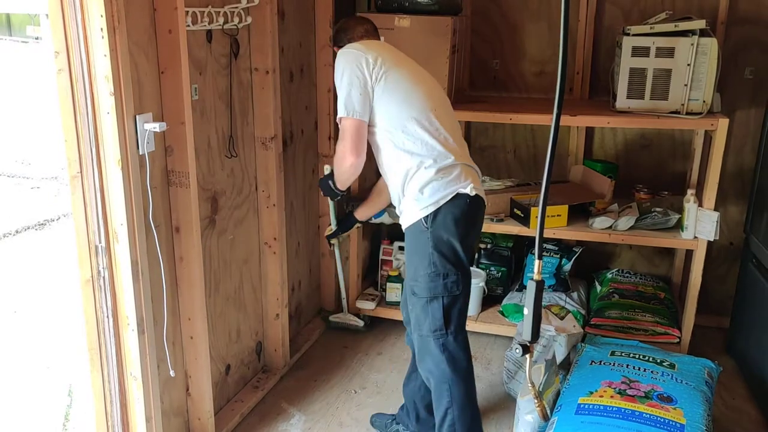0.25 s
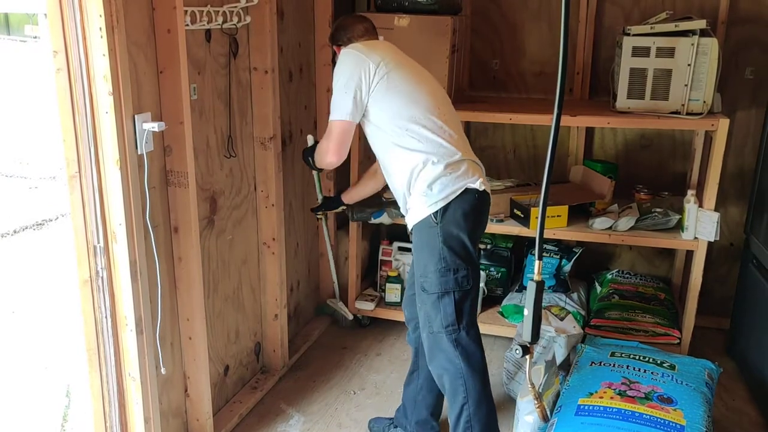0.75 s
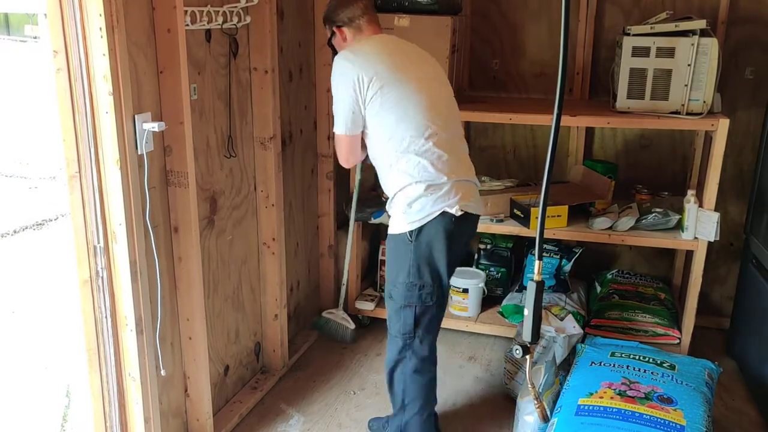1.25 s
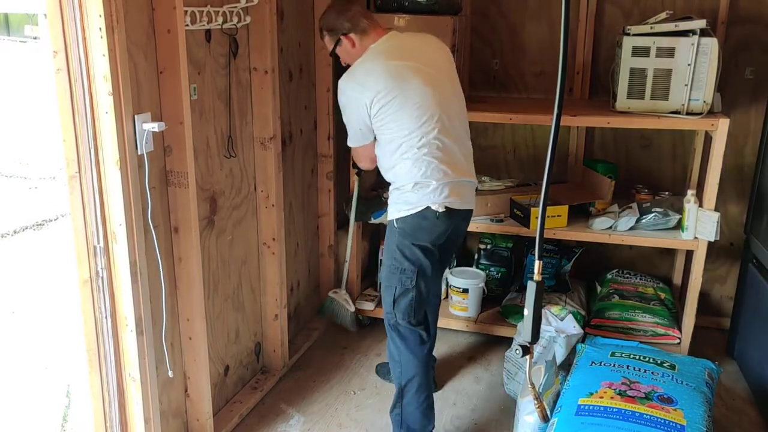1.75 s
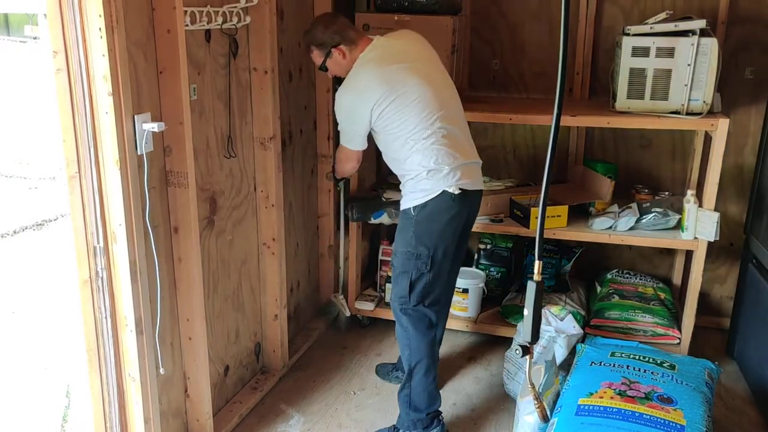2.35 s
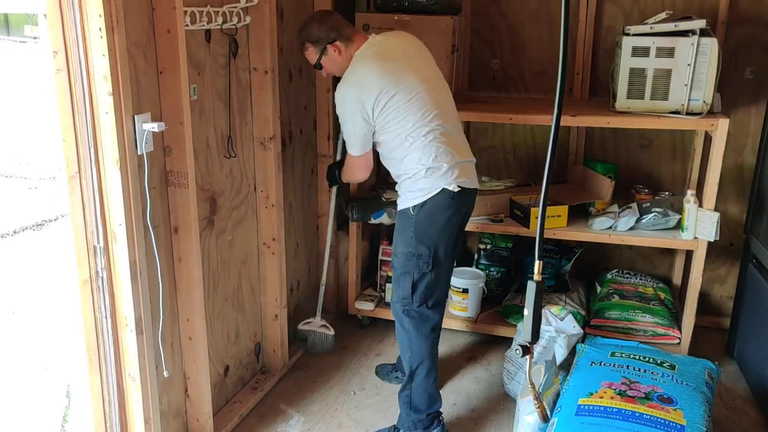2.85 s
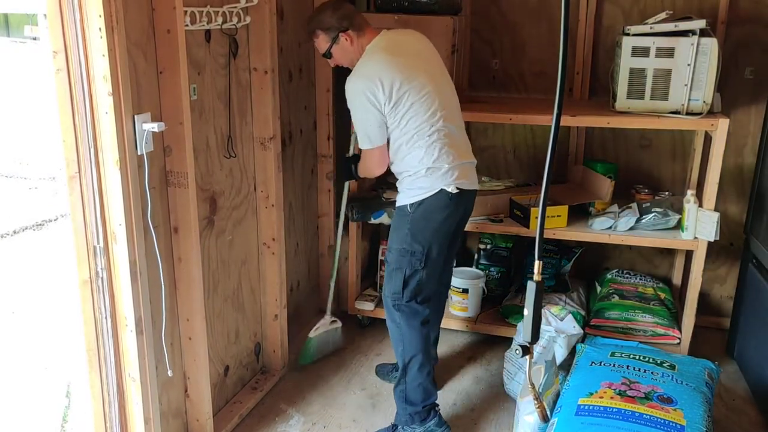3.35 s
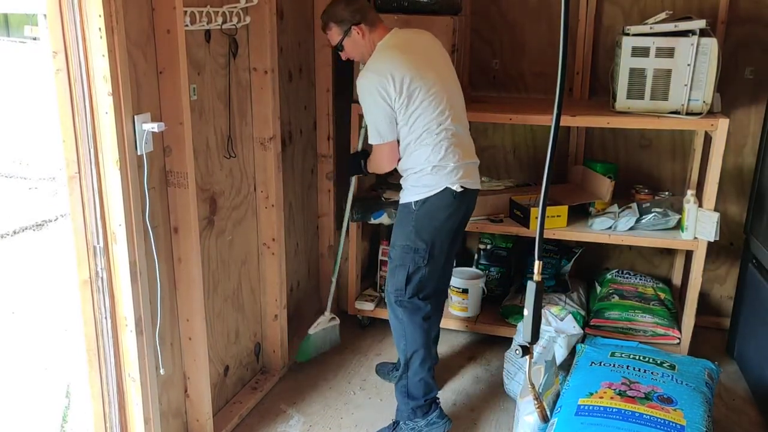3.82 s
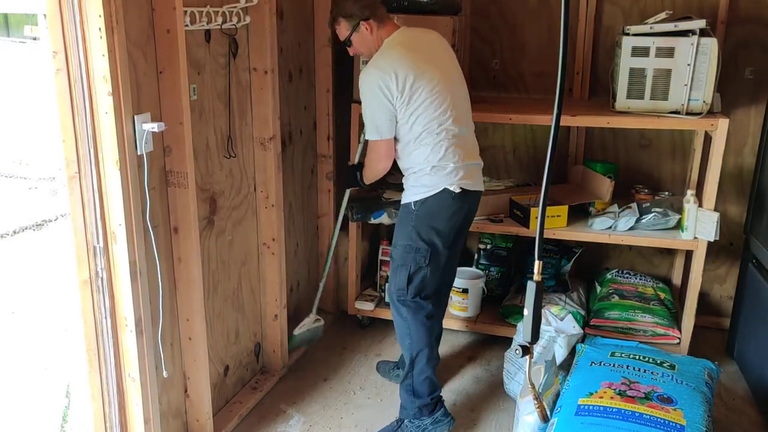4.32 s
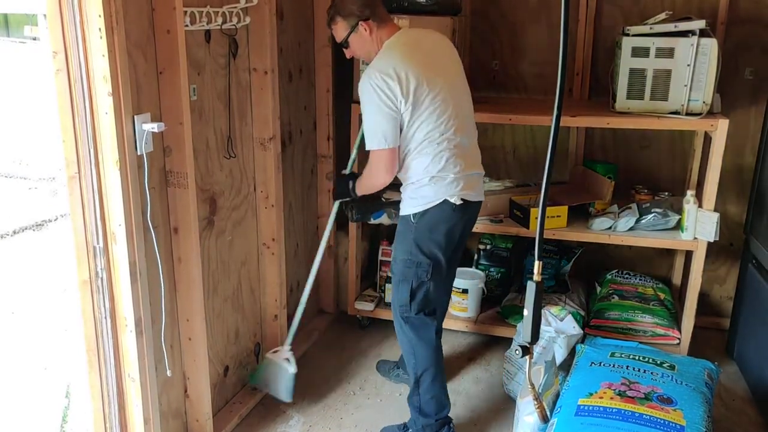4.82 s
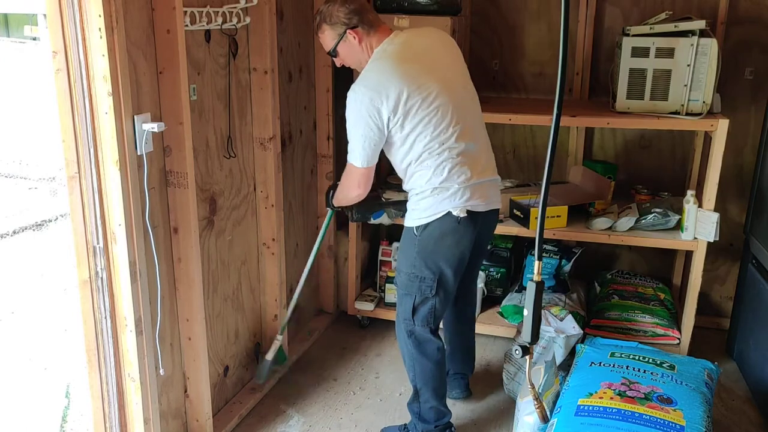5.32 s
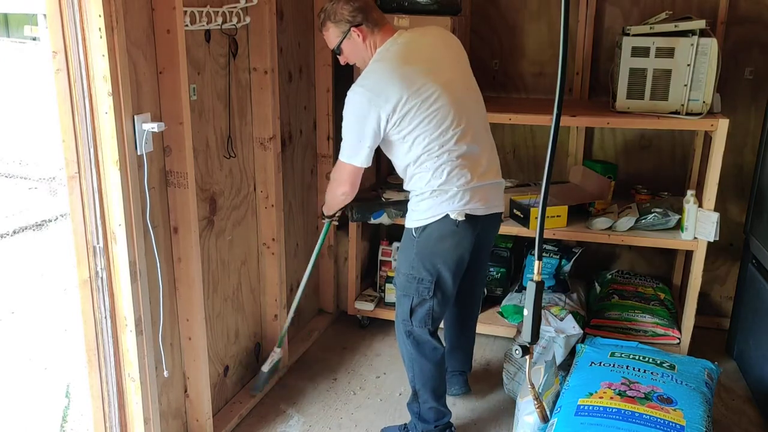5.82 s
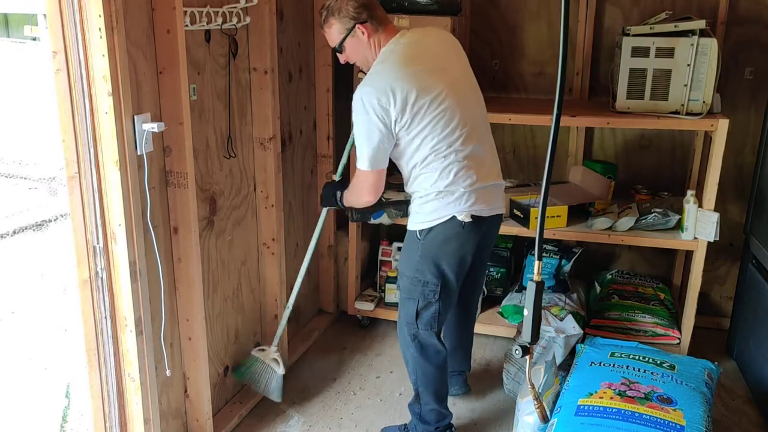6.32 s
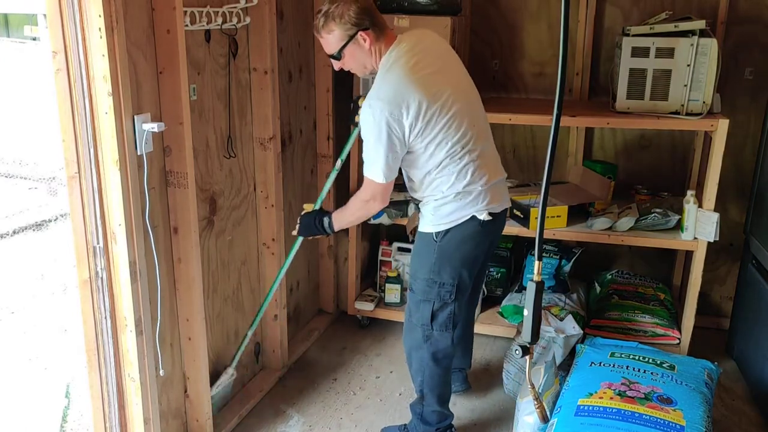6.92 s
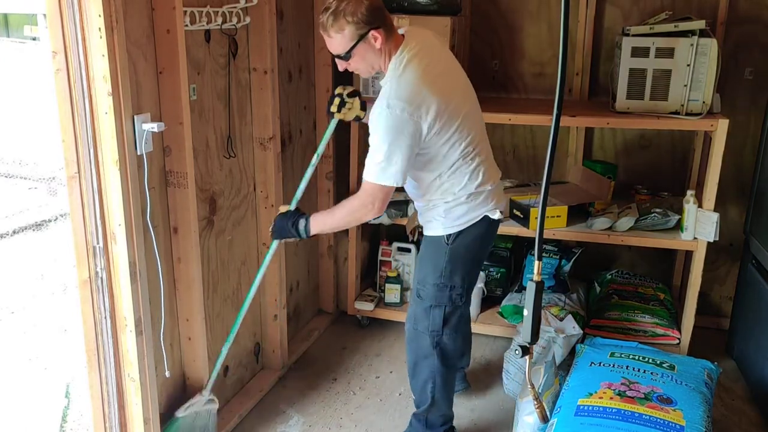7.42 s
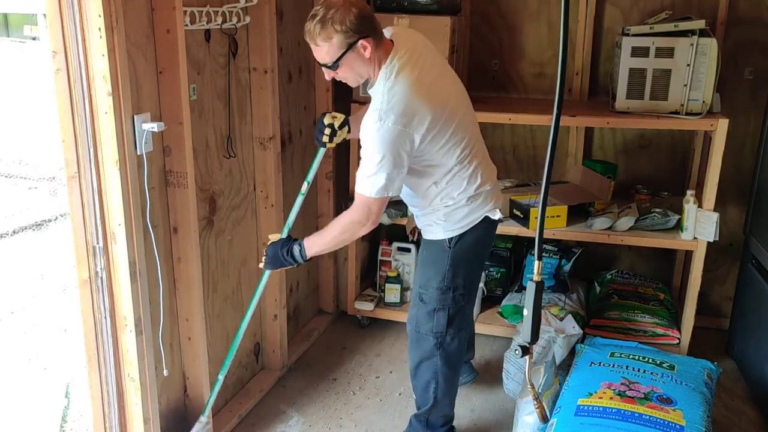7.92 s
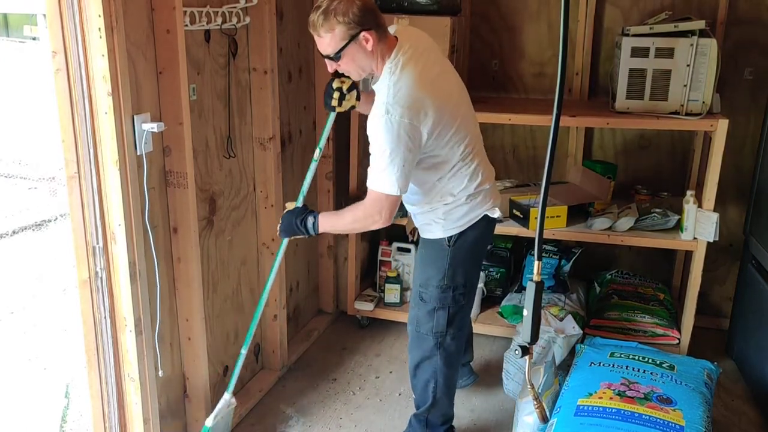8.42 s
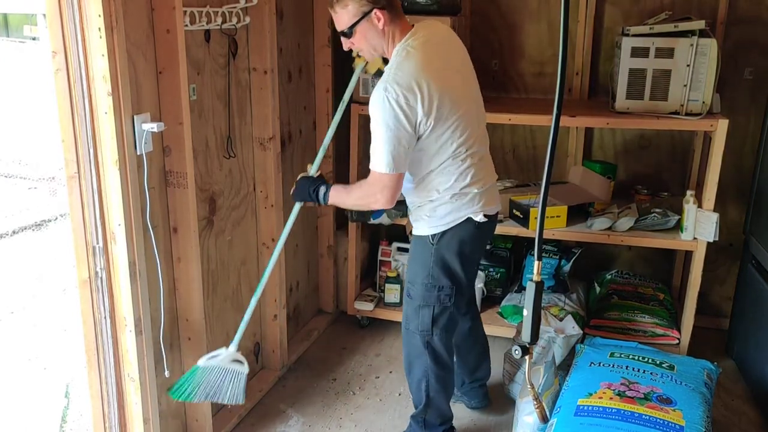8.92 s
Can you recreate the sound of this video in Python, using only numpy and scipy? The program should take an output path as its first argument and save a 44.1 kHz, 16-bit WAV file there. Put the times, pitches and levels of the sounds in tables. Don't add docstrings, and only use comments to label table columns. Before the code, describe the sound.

Close, dry broom strokes in a small wooden shed. Stiff bristles rasp and hiss in uneven passes, the brush drops and slaps, and grit ticks sharply in the middle. The plastic head knocks and rattles on planks, hardest near the end, while the raised floor thuds and booms low. Wide stereo treble, centred bass, very short room tail, faint steady air hiss.

```python
import sys
import numpy as np
from scipy import signal
from scipy.fft import rfft, irfft, next_fast_len
from scipy.io import wavfile
from scipy.ndimage import uniform_filter1d

SR = 44100
rng = np.random.default_rng(int(sys.argv[2]) if len(sys.argv) > 2 else 0)


def bounce(signal):
    frames = np.transpose(np.atleast_2d(signal))
    limited = np.clip(frames, -1, 1)
    pcm = np.round(limited * 32767).astype(np.int16)
    wavfile.write(sys.argv[1], SR, pcm)


def nominal_scale(level):
    x = np.asarray(level, float) / 20
    return 10 ** x


N = 404397

# [t/s of the peak, 20 dB fade/s, drag/dB, tips/dB re drag, pressure/dB re drag]
SWIPES = [(.05, 0.18, -42, -8.5, -11.5), (.22, 0.18, -47.5, -5.5, -3.5), (.35, 0.16, -54.5, -1, -2),
          (.44, 0.1, -53.5, -4, -9.5), (0.782, 0.11, -49, -5.5, -2.5), (1.05, 0.13, -47.5, -6, -8),
          (1.42, 0.3, -60, -6, 0), (1.55, .2, -62, -2, -6), (1.75, 0.24, -54.5, -3.5, -6),
          (2.15, .06, -58, 2, -6), (2.9, 0.19, -40, -7.5, -9), (3.44, 0.48, -43.5, -14, -5),
          (3.65, 0.48, -46.5, -22, -0.5), (3.8, 0.27, -46, -8, -3), (3.89, 0.16, -46.5, -25, -12),
          (4.58, 2, -66, -14, -5), (5.031, 0.16, -53, -6, -6), (5.1, .1, -52, -5.5, -5),
          (5.5, .06, -53, 0, -4), (5.556, 0.07, -50, 0.5, -7), (5.97, .09, -50.5, -17, -0.5),
          (6.2, 0.14, -55, -5, -1.5), (6.49, 0.15, -57, -1.5, -13.5), (7.08, 0.15, -49, -6.5, -2.5),
          (7.15, .05, -54, 1, -10), (7.87, .06, -52, -2, -2), (7.34, 0.34, -56, -9, -1.5),
          (7.96, 0.1, -47, -4.5, -5), (8.22, 0.17, -49, -2, -10), (8.93, 0.1, -48, -6, -2),
          (8.985, .13, -43.5, -18, -3)]
# [t/s, 20 dB fade/s, drag/dB, tips/dB re drag, pressure/dB re drag]
LANDINGS = [(1.275, 0.1054, -40.5, -11.5, -7), (1.625, 0.15, -47.5, -14.5, -1.5),
            (1.878, 0.2, -36, -3, -34), (2.035, 0.14, -38.5, -7.5, -4), (2.419, 0.22, -47.5, -7.5, 2),
            (2.72, 0.44, -59, -11, 12), (3.049, 0.24, -41, -11.5, -4), (4.056, 0.32, -44.5, -8.5, -11),
            (4.39, 0.32, -50, -4.5, -7), (5.12, 0.27, -45.5, -8.5, -4.5), (5.31, .25, -45.5, -11.5, 6),
            (5.842, 0.26, -49.5, -1, -3), (6.165, 0.28, -53, -2.5, -6.5), (6.714, .17, -44, -5, -4.5),
            (7.018, .15, -52, -3, -8), (7.573, 0.26, -44, -4.5, -0.5), (8.006, 0.14, -48, -2, -6),
            (8.307, 0.4, -50, -3, -1.5), (8.655, 0.3, -47.5, -4, -7), (8.736, 0.16, -43.5, -4, -4)]
# [t/s of the stop, 20 dB rise/s, drag/dB, tips/dB re drag, pressure/dB re drag]
RUNUPS = [
    (.73, 0.2, -60.5, 0, -12.5),
    (1.26, 0.2, -59, -16, -15),
    (2.34, 0.43, -60, -14, -19),
    (2.407, 0.17, -49.5, -6.5, -3),
    (2.705, 0.07, -52.5, -4, -3),
    (6.7, 0.24, -52, -5, -6.5),
    (7.559, 0.2, -52, -4.5, 0.5),
    (7.918, 0.13, -48, -4.5, -2.5),
    (8.292, 0.09, -44, -12.5, -8),
    (8.64, 0.2, -59, -7, -12),
]
# [t/s, level/dB, 20 dB fade/s]
THUDS = [(.06, -47.5, 0.2), (.215, -41, 0.3), (.74, -60.5, 0.5), (1.274, -46, 0.5), (1.625, -48.5, 0.13),
         (1.72, -45, .15), (2.036, -47, 0.23), (2.421, -43.5, 0.2), (2.76, -46.5, 0.34), (3.05, -54, 1.5),
         (3.27, -54.5, 1), (3.42, -52.5, 1), (3.72, -48, .35), (4.06, -48.5, 0.3), (4.39, -54, 0.5),
         (4.785, -45, .2), (5.04, -51, 0.6), (5.325, -39, 0.14), (5.49, -49.5, 0.22), (5.86, -58.5, 0.9),
         (6.16, -60, 0.9), (6.716, -40.5, 0.33), (7.06, -48, 0.7), (7.89, -50.5, .3), (7.573, -43, 0.4),
         (8.007, -40, 0.28), (8.26, -42.5, 0.4), (8.738, -46.5, 0), (8.94, -45, 0.18)]
# drag, tips, scrape, boards [level/dB each]
RESTING_DB = (-69.5, -75, -72.5, -70.5)
# [f/Hz, level/dB per Hz]
DRAG_COLOUR = [(710, -21.5), (1200, -5), (1670, 0), (1970, 0), (2500, -1.5), (4550, 1), (5340, -8.5),
               (6640, -9), (7290, -41), (9000, -49), (11700, -50), (19800, -120)]
# [f/Hz, level/dB per Hz]
TIPS_COLOUR = [(4120, -4.5), (7000, -1.5), (7990, -8), (9740, -9.5), (12400, -9), (15100, -7.5),
               (15800, -1)]
# [f/Hz, level/dB per Hz]
SCRAPE_COLOUR = [(180, -18.5), (300, -6), (527, -6), (571, -3), (772, -7.5), (849, -5.5), (956, -5),
                 (2000, -13), (2600, -10.5), (4400, -120)]
# [f/Hz, level/dB per Hz]
RUMBLE_COLOUR = [(30, -57), (45, -7.5), (68, 2.5), (100, -6), (150, -0.5), (200, -6.5), (300, -11),
                 (450, -21.5), (900, -90)]
# [f/Hz, level/dB per Hz]
AIR_COLOUR = [(35, -4.5), (60, -18), (87, -29), (1190, -32.5), (1890, -65), (4810, -52), (8820, -51),
              (14100, -37), (15800, -47)]
# [t/s of the first swell, level/dB]
SWAY = [(.1, -54), (.32, -62), (1.07, -58), (1.372, -39), (1.78, -67), (2.1, -30), (2.431, -33.5),
        (2.767, -38.5), (3.391, -36.5), (3.799, -32), (4.119, -31), (4.451, -29.5), (5.09, -40.5),
        (5.559, -38.5), (5.961, -40), (6.258, -37.5), (6.77, -28.5), (7.152, -32.5), (7.649, -24),
        (7.999, -26.5), (8.318, -24), (8.802, -28), (9.101, -39)]
# [t/s, peak level/dB, plank f/Hz, panel level/dB re plank, hardness/dB]
BUMPS = [(.041, -44, 360, 3, -2.5), (.196, -38, 467, -18, -12), (.584, -48.5, 331, 6.5, -17),
         (.767, -40, 390, -6, -12), (1.412, -44.5, 586, 12, -13.5), (1.618, -37, 550, -11, -15),
         (2.033, -35, 393, -5, -10), (2.359, -36.5, 427, -9, -10), (3.046, -37.5, 670, -17, -0.5),
         (3.272, -37.5, 377, 2, -19), (4.05, -41, 610, -6, -3), (2.036, -40, 1010, -20, -20),
         (2.362, -40, 380, -15, -15), (4.384, -40, 1200, -25, -25), (4.388, -42, 1430, -25, -25),
         (5.022, -50, 504, -8, 1), (5.268, -40.5, 380, 12, -12), (5.303, -35, 400, -3, 0),
         (5.487, -42, 538, 0, -8), (6.707, -41, 300, 6, -15), (6.745, -44, 250, 4, -15),
         (6.815, -47, 270, 0, -20), (6.956, -50, 600, -10, -6), (7.064, -36, 525, -2, -12),
         (7.496, -43.5, 605, 0, -7), (7.563, -34, 410, 0.5, -15), (7.927, -42, 390, -0.5, -8.5),
         (8.254, -32.5, 673, -4, -14)]
# [t/s, peak level/dB, plank f/Hz, panel level/dB re plank, panel f/Hz]
KNOCKS = [(1.265, -33.5, 316, 0, 242.5), (2.412, -26, 1080, -10.5, 303.7), (2.4175, -30, 1500, -15, 340),
          (2.7105, -20, 590, -6, 192), (2.7115, -26, 1220, -20, 192), (4.383, -46, 700, -4, 261),
          (4.565, -61, 300, 14, 253.4), (4.762, -47, 420, 2, 253), (7.998, -18.5, 409, -6.5, 279),
          (8.2985, -12, 400, -10.5, 275.6), (8.724, -40, 1000, -8, 250), (8.968, -34, 860, -14, 250),
          (8.985, -41, 600, -14, 300), (9.02, -42, 850, -10, 250)]
# [t/s, peak level/dB, plank f/Hz, panel level/dB re plank, panel f/Hz]
REBOUNDS = [(2.421, -31, 990, -2, 387), (2.431, -27, 840, -8, 520), (2.7185, -21, 930, 0, 189.6),
            (2.7442, -24.5, 388, 1.5, 194.6), (5.1138, -36, 980, -25, 250), (5.283, -38, 500, 0, 141),
            (5.322, -36, 900, -6, 140.6), (8.004, -27, 990, 2.5, 424), (8.304, -25.5, 851, 0, 275.7),
            (8.314, -26.5, 692, -2, 404), (8.345, -34, 850, 1.5, 405)]
# [f/Hz, level/dB]
WALL_MODES = [(140, -10), (192, -0.5), (277, 0.5), (400, -6.5), (440, -9), (515, -8), (608, -6.5),
              (715, -10), (840, -7.5), (920, -5), (1035, -7), (1165, -12), (1490, -16), (1750, -17),
              (2060, -21)]
# [f/Hz, level/dB]
DOOR_MODES = [(140, -10), (192, -8), (277, 0), (400, -4), (445, -8), (515, -10), (560, -10), (694, -8),
              (850, -7), (940, -11), (995, -13), (1335, -20), (1600, -10), (1870, -12)]
# [t/s, peak level/dB, burst level/dB re click]
FLICKS = [(.194, -36, -10.5), (0.4558, -41, -25), (2.292, -48, -13), (2.42, -34, -12), (2.5, -40, -14),
          (2.575, -44.5, -16.5), (2.675, -46.5, -7), (2.8176, -37, -11), (3.2698, -40, -9),
          (3.3122, -37.5, -12), (3.385, -39, -16), (3.6718, -33.5, -11.5), (4.1634, -37, -17),
          (4.2465, -40.5, -11.5), (5.8635, -35, -13.5), (3.1617, -32, -10), (3.4315, -26.5, -12.5),
          (3.5703, -34, -8.5), (3.6091, -21, -16.5), (3.8498, -28, -17), (3.8773, -24, -21),
          (4.0922, -29, -20), (4.1929, -33, -14.5), (5.387, -32.5, -16.5), (5.5905, -39.5, -15),
          (5.825, -41.5, -9.5), (6.0325, -38, -12), (6.0995, -40, -17.5), (6.1527, -41, -11),
          (6.706, -30, -11.5), (8.6484, -33, -9), (8.728, -31.5, -15.5)]
# [t/s, peak level/dB, centre f/Hz]
TAPS = [(0.768, -31.5, 3040), (1.6166, -33.5, 1270), (3.215, -33, 3000), (3.5164, -29, 1570),
        (3.953, -36.5, 2800), (4.0286, -32, 1840), (6.709, -28, 2200), (6.956, -34.5, 2500),
        (7.226, -33.5, 2860), (7.3242, -37, 2600), (7.436, -36, 2760), (8.4649, -31.5, 2750),
        (8.898, -37, 2070), (8.965, -32, 1500), (8.982, -31, 2000), (9.005, -34, 2300)]
# [t/s, peak level/dB, centre f/Hz, burst level/dB re click, treble level/dB]
SLAPS = [(1.265, -27.5, 1680, -7, -18), (1.868, -32, 2390, -11, 0), (2.0273, -26, 1530, -10.5, -14),
         (2.36, -34, 1950, -9.5, -8), (2.4124, -17.5, 1260, -14, -26), (2.7095, -31, 2500, -16, -18),
         (2.7195, -30, 2670, -14.5, -20), (3.0452, -20.5, 1700, -9, -24), (4.386, -36, 1600, -4, -12),
         (5.1138, -13, 2030, -19, -22), (5.1205, -21, 2400, -12, -22), (5.267, -32, 1280, -5, -15.5),
         (5.303, -19, 2010, -8.5, -38), (7.5637, -24.5, 1550, -10.5, -6), (7.9237, -21, 1510, -11, -10),
         (7.9997, -22.5, 1640, -10, -31), (8.1392, -31.5, 6500, -16, -14.5), (8.227, -37, 1050, -5, -5),
         (8.252, -24.5, 1320, -7.5, -12.5), (8.297, -26, 1570, -7, -28), (8.73, -28, 1680, -6.5, -14),
         (8.92, -36, 1820, -4, -27)]
# [f/Hz, width/Hz, level/dB]
HEAD_MODES = [(980, 28, -7), (1840, 35, -1), (2030, 32, -1), (2390, 48, 0), (3335, 23, -5), (3725, 48, -8),
              (4063, 68, -5), (4860, 38, -9)]
# [f/Hz, level/dB]
CASE_COLOUR = [(5000, 2.5), (7000, -4), (9000, -12), (12000, -11.5), (15500, -4)]
# [t/s, level/dB, f/Hz, free ring/s]
BOOMS = [(.215, -46, 140, .04), (.27, -50, 60, .1), (1.275, -38, 240, .03), (1.43, -47, 75, .08),
         (1.46, -48, 170, .04), (1.62, -49, 80, .05), (1.735, -44, 150, .03), (2.42, -46, 110, .06),
         (2.72, -46, 100, .08), (2.722, -31, 191, .09), (2.04, -44, 310, .05), (2.05, -46, 140, .06),
         (4.765, -44, 70, .1), (4.764, -34.5, 253, .04), (4.825, -44, 190, .02), (5.04, -50, 150, .08),
         (5.272, -33, 150, .025), (5.29, -41, 72, .05), (5.311, -25, 141, .036), (5.41, -46, 140, .04),
         (5.2, -50, 85, .06), (5.52, -50, 110, .08), (6.21, -54, 110, .04), (6.712, -41, 68, .06),
         (7.02, -48, 160, .04), (7.07, -43, 90, .05), (7.93, -42, 67, .08), (8.003, -34, 277, .045),
         (8.31, -35, 277, .05), (8.76, -45, 140, .03), (8.9, -44, 80, .05), (8.96, -44, 120, .03)]
# [f/Hz, t60/s]
SHED_T60 = [(150, 0.4), (1000, 0.3), (4000, 0.064), (12000, 0.054)]
# [f/Hz, likeness 0..1]
ALIKE = [(100, 0.97), (300, 0.87), (600, 0.43), (1200, 0.089), (16000, 0.039)]
# [f/Hz, left minus right/dB]
LEAN = [(200, .3), (700, 1.5), (2400, 3.6), (4500, -.2), (9000, 1.4)]

FLICK_HZ = 3830


def unit(x):
    return x / np.sqrt(np.mean(x ** 2) + 1e-20)


def along(points, hz):
    f, v = np.transpose(points)
    return np.interp(np.log(hz + 1), np.log(f + 1), v)


def filtered(x, response):
    m = next_fast_len(x.shape[-1] + SR // 8)
    return irfft(rfft(x, m) * response(np.fft.rfftfreq(m, 1 / SR)), m)[..., :x.shape[-1]]


def resonance(hz, width_hz):
    return lambda f: 1j * f * width_hz / (hz * hz - f * f + 1j * f * width_hz)


def add(track, s, sound):
    part = track[:, round(s * SR):][:, :sound.shape[1]]
    part += sound[:, :part.shape[1]]


def wander(samples):
    return unit(uniform_filter1d(rng.standard_normal(N), size=samples))


def friction(spectrum, grain_db, patchy_db, clump_db=2.0):
    slips = rng.standard_normal((2, N)) * nominal_scale(grain_db * wander(60))
    slips = slips * nominal_scale(clump_db * wander(1300))
    z = signal.stft(slips, nperseg=512)[2]
    field = uniform_filter1d(rng.standard_normal(z.shape[1:]), size=6, axis=0)
    field = uniform_filter1d(field, size=8, axis=1)
    pair = signal.istft(z * nominal_scale(patchy_db * unit(field)), nperseg=512)[1][:, :N]
    return unit(filtered(pair, lambda hz: nominal_scale(along(spectrum, hz))))


def still_air():
    return nominal_scale(-58.0) * friction(AIR_COLOUR, grain_db=0.8, patchy_db=0.0, clump_db=1.5)


def curves(rows, rest_db, rounded):
    t = np.arange(0, N, 128) / SR
    power = nominal_scale(2 * rest_db)
    for s, rise, fade, db in rows:
        away = np.where(t < s, (s - t) / rise, (t - s) / fade)
        power = power + nominal_scale(2 * (db - 20 * away ** rounded))
    return np.interp(np.arange(N) / SR, t, 10 * np.log10(power))


def strokes():
    drop_s, stop_s, thud_rise_s = 0.018, 0.059, 0.044
    swell_share = 0.91
    rows = [(s, drop_s, fade, *db) for s, fade, *db in LANDINGS]
    rows += [(s, swell_share * fade, fade, *db) for s, fade, *db in SWIPES]
    rows += [(s, rise, stop_s, *db) for s, rise, *db in RUNUPS]
    s, rise, fade, drag_db, tips_db, press_db = np.transpose(rows)
    parts = [np.transpose([s, rise * linger, fade * linger, drag_db + db])
             for linger, db in [(1, 0), (0.88, tips_db), (0.91, press_db)]]
    parts.append([(s, thud_rise_s, fade, db) for s, db, fade in THUDS])
    rounded = (1, 1.75, 1, 1)
    drag, tips, scrape, boards = map(curves, parts, RESTING_DB, rounded)
    return drag, tips - drag, scrape, boards


def grit():
    grains_per_s = 320
    size = nominal_scale(5 * np.minimum(rng.exponential(size=N), 2.5))
    grains = (rng.random(N) < grains_per_s / SR) * size
    grains = grains * np.sign(rng.standard_normal((2, N)))
    return unit(filtered(grains, lambda f: resonance(3800, 4000)(f) ** 2 * nominal_scale(along(CASE_COLOUR, f))))


def sweeping():
    drag_db, tips_db, scrape_db, boards_db = strokes()
    drag = nominal_scale(drag_db - 3.0) * friction(DRAG_COLOUR, grain_db=2.0, patchy_db=2.2, clump_db=2.6)
    loosened_db = np.minimum(-tips_db, 10.5)
    flicked = nominal_scale(drag_db + loosened_db - 20.5) * grit()
    tips = nominal_scale(drag_db + tips_db + 1.5) * friction(TIPS_COLOUR, grain_db=0.0, patchy_db=-2.0)
    scrape = nominal_scale(scrape_db) * friction(SCRAPE_COLOUR, grain_db=1.0, patchy_db=2.5)
    boards = nominal_scale(boards_db) * friction(RUMBLE_COLOUR, grain_db=0.5, patchy_db=2.0)
    return drag + flicked + tips + scrape + boards


def sway():
    joists_hz, beat_hz, joists_t60 = 25.7, 5.88, 1
    out, t = np.zeros((1, N)), np.arange(SR) / SR
    swell = np.sin(np.pi * beat_hz * t) * nominal_scale(-60 * t / joists_t60)
    wave = swell * np.sin(2 * np.pi * joists_hz * t + 1.2)
    for s, db in SWAY:
        add(out, s - 0.075, nominal_scale(db + 8.0) * wave[None])
    return out


def blows_on_wood():
    floor_panel_hz = 150.6
    wall = [(*row, -12.5 + 0.02 * (min(row[2], 900) - 450)) for row in KNOCKS + REBOUNDS]
    return wall + [(*row[:-1], floor_panel_hz, row[-1]) for row in BUMPS]


def planking(modes, panel_db, hard_db):
    scatter_db = 1.5 * rng.standard_normal(len(WALL_MODES))

    def share_db(hz):
        if hz < 330:
            return panel_db - 2.0
        return hard_db + 7.5 if hz > 700 else 0

    def response(f):
        wood = 0
        for k, (hz, level) in enumerate(modes):
            gain = nominal_scale(level + share_db(hz) + scatter_db[k])
            wood = wood + (-1) ** k * gain * resonance(hz, 12 + 0.025 * hz)(f)
        soft = (1 - (f / 1300) ** 2 + 1j * f / 1250) ** -2
        high = 1 / (1 + (650 / (f + 1)) ** 4)
        return wood * soft * np.array([[1 - high], [high]])

    return response


def knocks():
    door_from_s = 7.4
    lag = 30
    out, t = np.zeros((2, N)), np.arange(SR // 3) / SR
    quarter = np.array([[0], [np.pi / 2]])
    for s, db, plank_hz, panel_db, panel_hz, hard_db in blows_on_wood():
        rattle = rng.standard_normal((2, len(t))) * nominal_scale(-60 * np.maximum(t - 0.012, 0) / 0.13)
        rattle = rattle * (1 - np.exp(-t / 0.003))
        rattle[0, 0], rattle[1, lag] = 14, 14
        drives = np.array([rattle, 1.9 * rattle * nominal_scale(-60 * t / 0.16)])
        modes = WALL_MODES if s < door_from_s else DOOR_MODES
        wall = nominal_scale(15.5) * filtered(drives, planking(modes, panel_db, hard_db)).sum(axis=0)
        plank = nominal_scale(0.3 - 60 * t / 0.085) * np.sin(2 * np.pi * plank_hz * t + quarter)
        plank = plank * (1 - np.exp(-t / 0.0025))
        panel = nominal_scale(panel_db - 0.5 - 60 * t / 0.22) * np.sin(2 * np.pi * panel_hz * t + quarter)
        panel = panel * (1 - np.exp(-t / 0.012))
        add(out, s - 0.001, nominal_scale(db) * (wall + (plank + panel) * [[1], [0.22]]))
    return out


def contacts():
    taps = [(s, db, hz, -12, -33) for s, db, hz in TAPS]
    flicks = [(s, db, FLICK_HZ, burst_db, -32) for s, db, burst_db in FLICKS]
    return SLAPS + taps + flicks


def brush_colour(hz, treble_db):
    def response(f):
        head = sum((-1) ** k * resonance(c, 1.5 * w)(f) for k, (c, w, _) in enumerate(HEAD_MODES))
        body = resonance(hz, 0.9 * hz)(f) ** 2 * (0.95 + nominal_scale(-5.5) * head)
        return body + nominal_scale(treble_db + 2.5) * resonance(6000, 9000)(f)

    return response


def slaps():
    out, t = np.zeros((2, N)), np.arange(SR // 4) / SR
    for s, db, hz, burst_db, treble_db in contacts():
        t60 = 0.29 * nominal_scale(0.41 * burst_db)
        burst = nominal_scale(burst_db + 2.0 - 60 * t / t60) * rng.standard_normal((2, len(t)))
        click = nominal_scale(-60 * t / 0.0018) * np.sign(rng.standard_normal((2, len(t))))
        hit = burst + 2.12 * min(hz / FLICK_HZ, 1) * click
        add(out, s, nominal_scale(db + 7.5) * filtered(hit, brush_colour(hz, treble_db)))
    return filtered(out, lambda f: nominal_scale(along(CASE_COLOUR, f)))


def shed(x):
    hz, t, z = signal.stft(rng.standard_normal((2, SR // 2)), SR, nperseg=256)
    tail = signal.istft(z * nominal_scale(-60 * t / along(SHED_T60, hz)[:, None]), SR, nperseg=256)[1]
    late = np.pad(x, ((0, 0), (200, 0)))
    return signal.fftconvolve(late, tail / np.linalg.norm(tail[0]), axes=1)[:, :N]


def booms():
    rise_s, t60 = 0.012, 0.085
    out, t = np.zeros((1, N)), np.arange(SR // 3) / SR
    for s, db, hz, free_s in BOOMS:
        swell = nominal_scale(db + 5.5 - 60 * np.maximum(t - free_s, 0) / t60) * (1 - np.exp(-t / rise_s))
        add(out, s, (swell * np.sin(2 * np.pi * hz * t))[None])
    return out


def spread(pair):
    def mid_side(hz):
        turn = np.arccos(np.clip(along(ALIKE, hz), -1, 1)) / 2
        return np.array([np.cos(turn), np.sin(turn)])

    mid, side = filtered(pair, mid_side)
    return np.array([mid + side, mid - side])


def scene():
    air, brush = still_air(), nominal_scale(4) * sweeping()
    knock, slap = knocks(), slaps()
    blows = slap + knock + shed(nominal_scale(-10.0) * slap + nominal_scale(-10.5) * knock)
    return spread(brush + blows + air) + sway() + booms()


def top_cut(x):
    return signal.sosfilt(signal.butter(12, 15840, fs=SR, output="sos"), x)


def record(dry):
    top_hz = 15870
    mix = filtered(dry, lambda hz: nominal_scale(np.outer([0.5, -0.5], along(LEAN, hz))) * (hz < top_hz))
    return top_cut(mix)


dry = scene()
out = record(dry)
bounce(out)
```